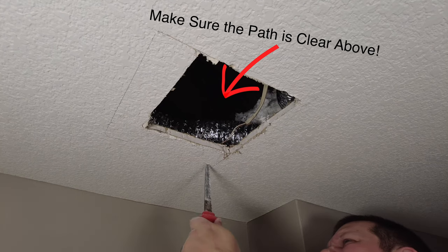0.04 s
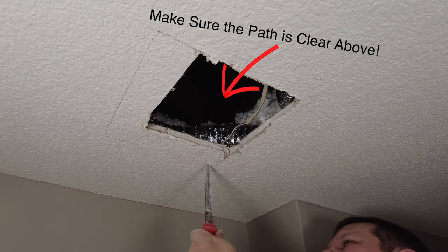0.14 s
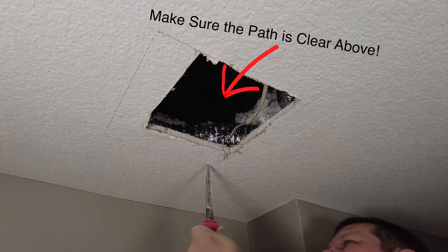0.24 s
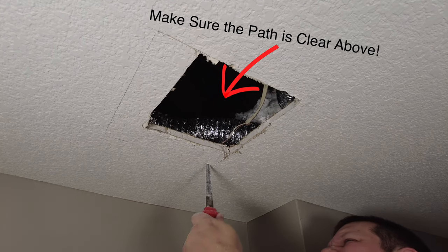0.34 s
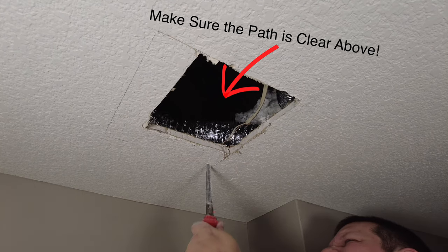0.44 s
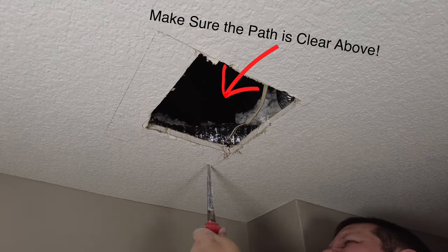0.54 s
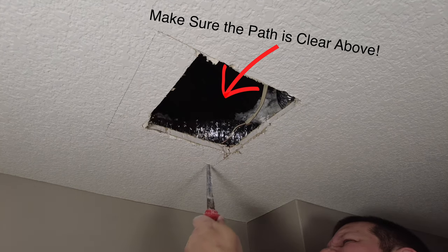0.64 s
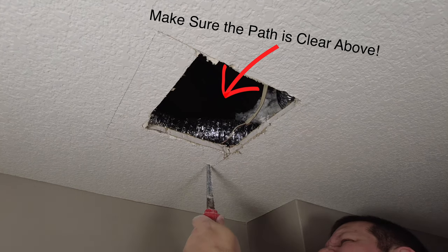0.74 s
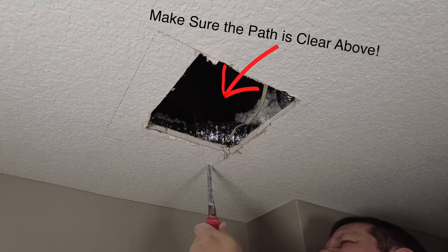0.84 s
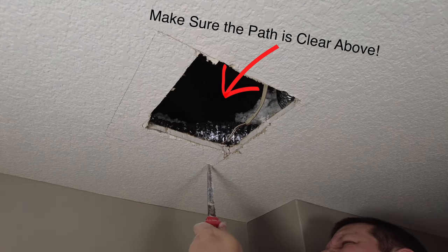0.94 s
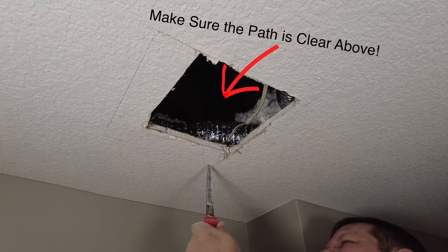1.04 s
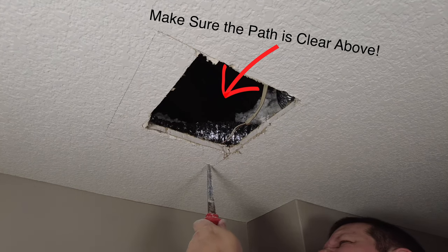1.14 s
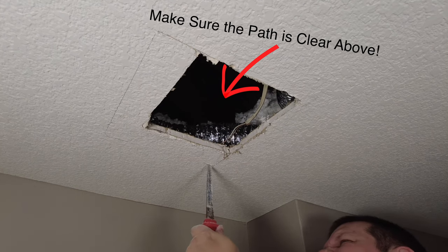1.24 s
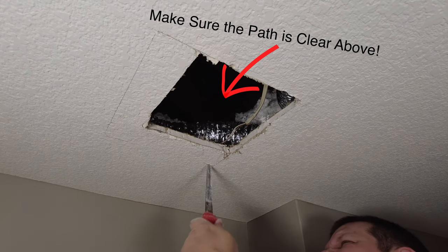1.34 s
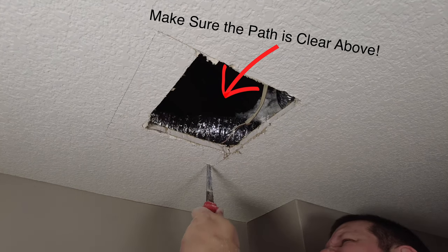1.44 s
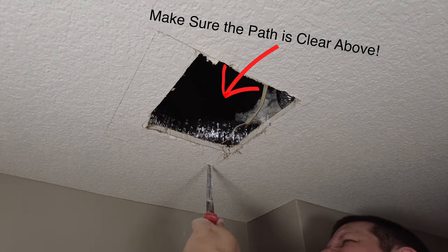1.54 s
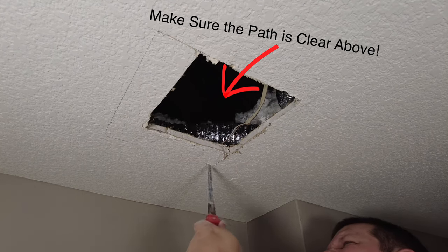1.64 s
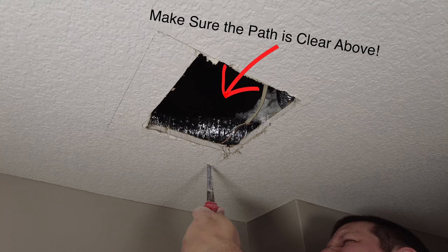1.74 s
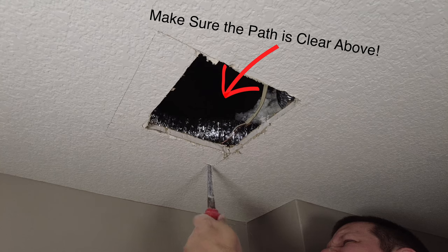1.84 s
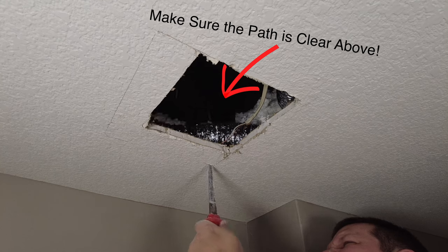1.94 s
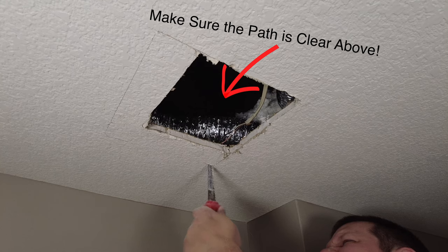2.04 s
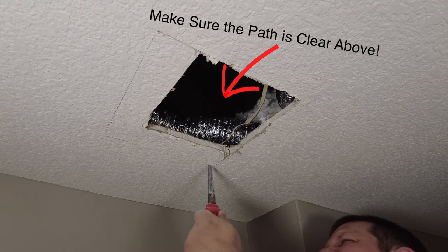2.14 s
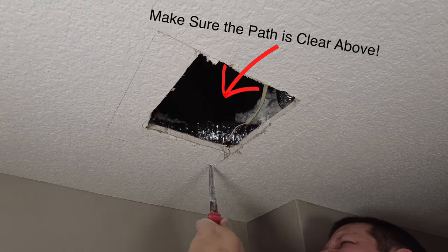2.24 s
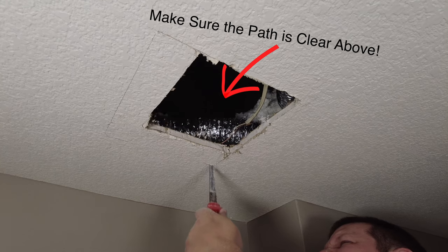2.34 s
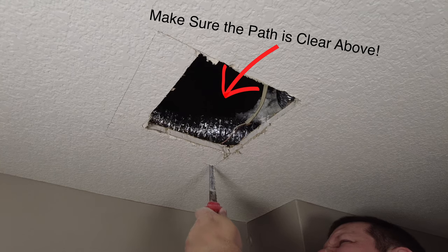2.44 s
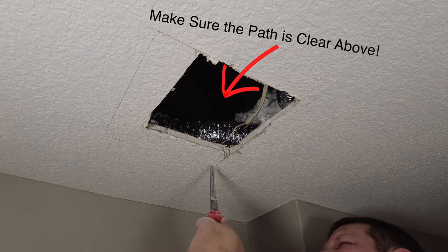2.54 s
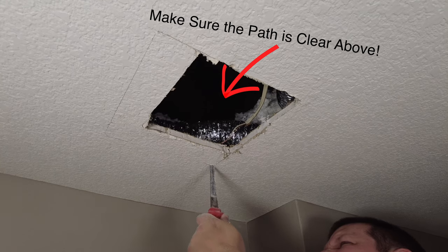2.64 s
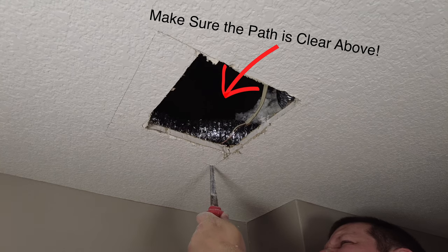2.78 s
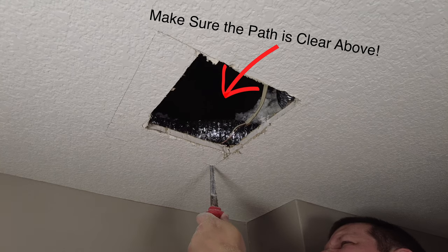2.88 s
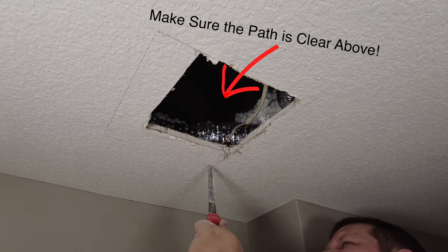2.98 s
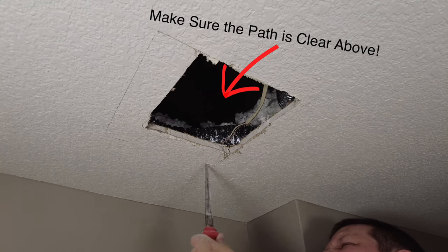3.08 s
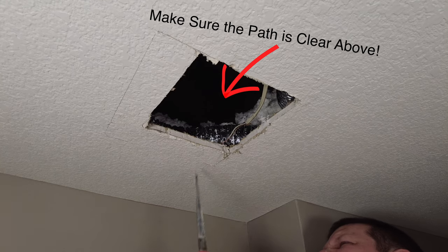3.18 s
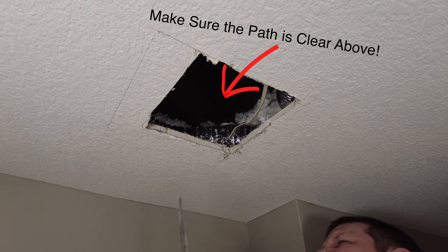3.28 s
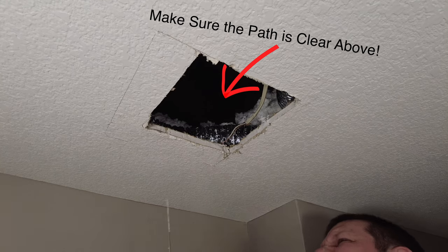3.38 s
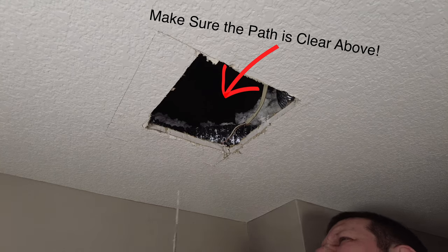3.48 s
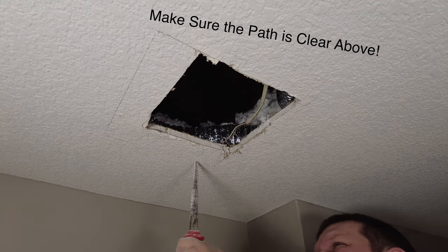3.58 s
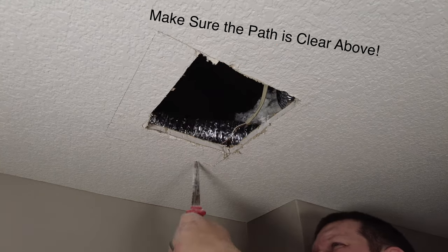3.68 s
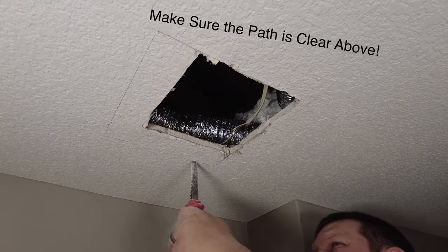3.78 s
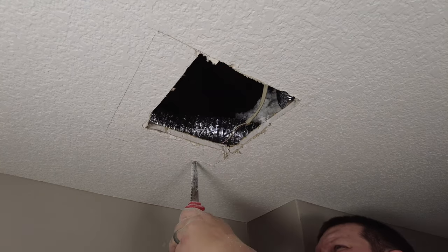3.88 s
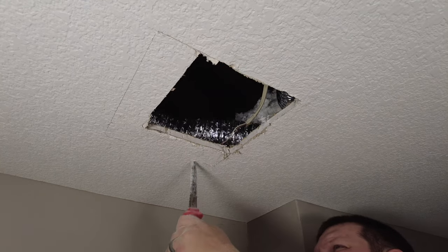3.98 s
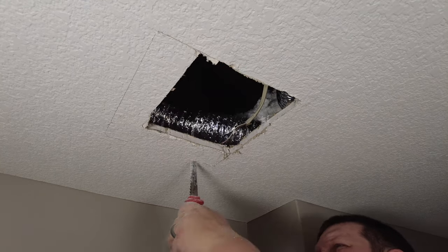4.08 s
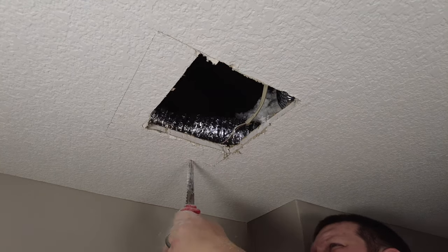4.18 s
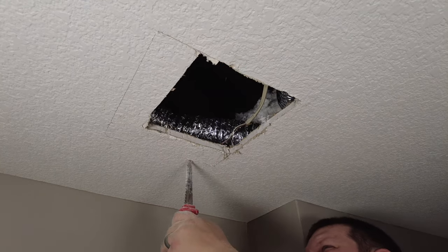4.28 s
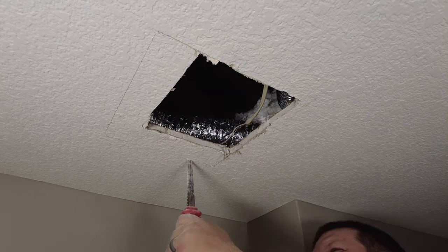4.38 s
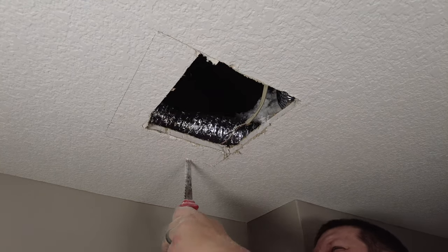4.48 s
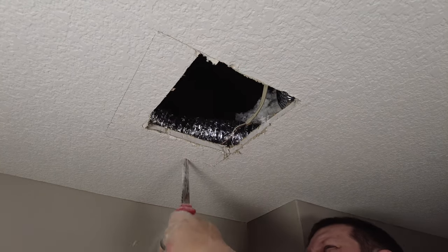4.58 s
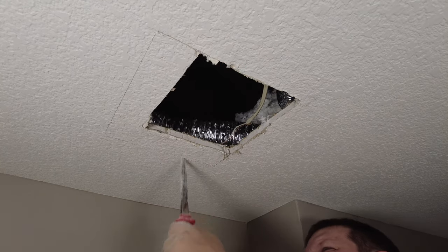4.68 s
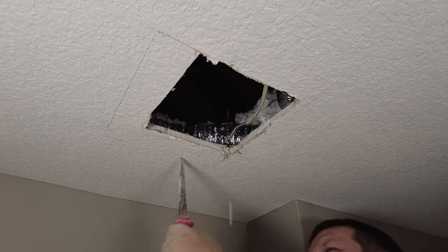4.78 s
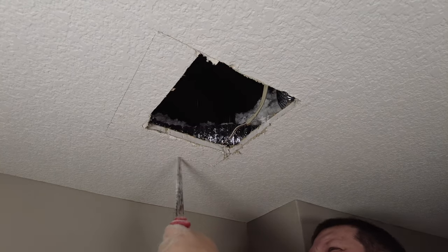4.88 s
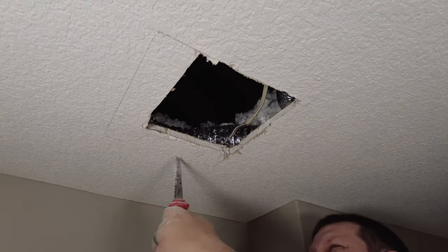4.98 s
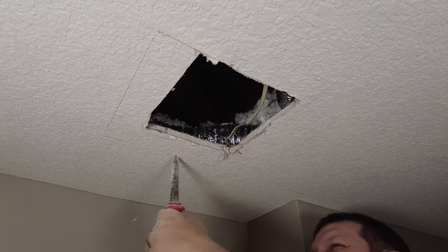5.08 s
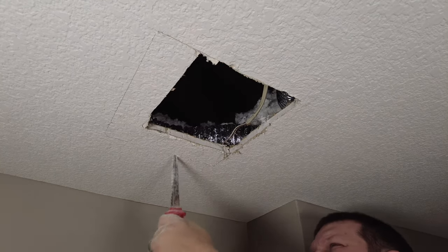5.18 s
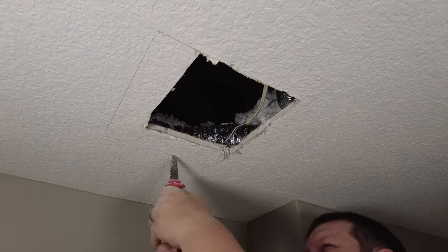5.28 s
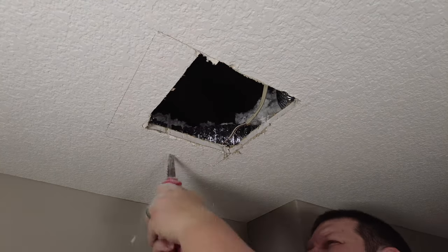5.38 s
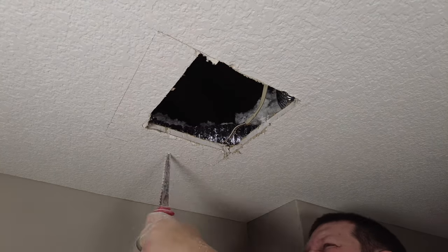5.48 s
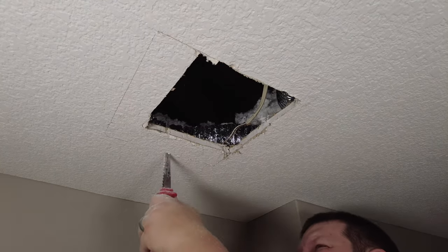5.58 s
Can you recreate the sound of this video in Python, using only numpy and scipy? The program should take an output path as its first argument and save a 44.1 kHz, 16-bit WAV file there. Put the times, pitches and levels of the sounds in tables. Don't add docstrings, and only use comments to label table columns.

```python
import sys
import numpy as np
from scipy import signal
from scipy.fft import rfft, irfft, next_fast_len
from scipy.io import wavfile
from scipy.ndimage import uniform_filter1d

SR = 44100
rng = np.random.default_rng(int(sys.argv[2]) if len(sys.argv) > 2 else 0)


def volts(x):
    e = np.asarray(x, float) / 20
    return 10 ** e


def unload_wav(signal):
    wavfile.write(
        sys.argv[1],
        SR,
        np.round(np.clip(np.atleast_2d(signal).T, -1, 1) * 32767).astype(np.int16),
    )


N = 247940
T = np.arange(N) / SR

# freq_hz, level_db_per_hz
AIR_SPECTRUM = [(15, -37), (25, 10.5), (77, -4), (152, -24), (458, -17.5), (946, -29), (1380, -29),
                (4630, -34.5), (13600, -52), (15600, -66)]
# start_s, length_s, force_db, flex_db, dust_db
PUSHES = [
    (-.1, 0.099, -31, -4, 14),
    (0.241, 0.2, -35, 2.5, 18),
    (0.612, 0.12, -24.5, 5, 2),
    (1.135, 0.026, -38, 16.5, 4),
    (1.378, 0.11, -24, -9, -4.5),
    (1.689, .12, -29.5, 3, 9),
    (1.996, 0.15, -26, 0.5, 2),
    (2.326, 0.11, -25.5, -3.5, 1),
    (2.611, 0.036, -49, -14, 32),
]
# start_s, length_s, force_db, flex_db, dust_db
PULLS = [(0.079, 0.14, -37.5, 4.5, 9), (0.44, 0.14, -33.5, 0, 5), (0.782, 0.14, -33.5, 2, 6),
         (0.959, 0.044, -44.5, 16.5, -8), (1.223, 0.099, -38.5, 1.5, 5), (1.347, 0.081, -33, 1.5, 7.5),
         (1.523, .13, -30.5, 0.5, 1), (1.841, 0.12, -28.5, -2, -2), (2.163, 0.14, -30.5, 0.5, 2.5),
         (2.477, 0.1, -29.5, -5.5, 1.5), (2.663, 0.085, -33.5, 3.5, 0), (2.822, 0.13, -57, -12, 7),
         (2.926, 0.15, -40.5, -9.5, 6), (3.051, 0.088, -43, -19, 9.5), (3.108, 0.084, -38, -10.5, 10)]
# start_s, length_s, force_db, flex_db, dust_db
DRAGS = [(3.59, 0.082, -54.5, 1, 5), (3.654, .18, -31, -3, 4), (3.915, 0.05, -60, 3.5, 5),
         (3.967, 0.033, -53, -1, -3), (4.008, 0.087, -37, -1.5, 16), (4.075, 0.2, -32, -6.5, 5),
         (4.26, 0.059, -32, 7.5, 4), (4.417, 0.067, -36.5, 1.5, 14), (4.476, 0.33, -31.5, 4, 4.5),
         (4.797, 0.087, -32, 10, 9), (4.878, 0.1, -29.5, 2.5, 2), (5.027, 0.085, -35.5, 4, 8),
         (5.152, 0.095, -42, 4.5, 1), (5.274, 0.13, -34.5, -1.5, 8), (5.384, 0.11, -33.5, -17, -1),
         (5.533, 0.016, -45, 11, 12), (5.583, 0.18, -24.5, -4.5, 0)]
# over_force_db, rise_s, sag_db_per_s, release_db_per_s
PUSH_LAYERS = [(2.5, 0.028, 13, 195), (2, 0.014, 9.5, 216), (-10.5, 0.01, 22, 249), (-27.5, 0.003, 95, 261)]
PULL_LAYERS = [(6.5, 0.026, 5, 250), (-1.5, 0.012, 26, 164), (-10.5, 0.012, 36, 157),
               (-24.5, 0.0077, 17, 370)]
DRAG_LAYERS = [(2.5, 0.0057, 2.1, 790), (-1, 0.0085, 18, 640), (-17.5, 0.0042, 2.6, 650),
               (-30.5, 0.012, 5, 1800)]
# drum_db, bite_db, scrape_db, grit_db
ARCH_DB = [
    [2.8, 6.4, 5.8, 0.72],
    [3.2, 3.4, 2.2, 7.8],
    [2.5, 0.94, 3.6, 1.3],
]
FLEX_SHARE = [1, 0.12, 0.016, 0.037]
DUST_SHARE = [0.037, 0.029, 0.11, 1]
# time_s, force_db
SNAGS = [(0.146, -34), (0.627, -24), (0.681, -22.5), (0.979, -34), (1.153, -31.5), (1.374, -32),
         (1.434, -24), (1.698, -26), (2.013, -22), (2.34, -21.5), (3.673, -36), (3.736, -28), (3.785, -25),
         (4.036, -27.5), (4.095, -27.5), (4.197, -25), (4.299, -28.5), (4.434, -43), (4.493, -31.5),
         (4.58, -35), (4.755, -30), (4.812, -33), (4.854, -35), (4.949, -29), (5.094, -30), (5.226, -30.5),
         (5.284, -33), (5.302, -22.5), (5.351, -28), (5.455, -35.5), (5.507, -37), (5.602, -26)]
# over_force_db, rise_s, fall_s
SNAG_LAYERS = [(-33, .002, .01), (-5, 0.00093, 0.01), (-16.5, 0.00074, 0.0062), (-38, 0.0011, 0.0053)]
STICK_DEPTH = [0.15, 0.18, 0.18, 0.28]
# time_s, force_db, fall_s
JERKS = [(1.697, -25.5, 0.024), (2.012, -55, 0.014), (2.345, -35, 0.023), (3.626, -44, .025),
         (3.671, -24, 0.022), (3.735, -23.5, 0.02), (3.782, -25, 0.022), (4.021, -51, 0.029),
         (4.091, -23.5, 0.022), (4.143, -21, 0.027), (4.199, -26, 0.029), (4.29, -20.5, 0.025),
         (4.433, -46, 0.02), (4.488, -20, 0.0081), (4.578, -25, 0.02), (4.641, -31, 0.022),
         (4.668, -23.5, 0.035), (4.752, -19.5, 0.025), (4.813, -36, 0.018), (4.85, -24, 0.025),
         (4.901, -47, 0.077), (4.945, -29.5, 0.026), (5.054, -42, 0.039), (5.095, -25.5, 0.036),
         (5.22, -28.5, 0.034), (5.291, -23, 0.035), (5.353, -22.5, 0.035), (5.41, -5.5, 0.014),
         (5.453, -18, 0.029), (5.598, -31.5, 0.045)]
# over_force_db, rise_s, fall_stretch
JERK_LAYERS = [(-6, 0.0016, 0.86), (-3, 0.0048, 0.99), (-19, 0.0053, 0.9), (-33.5, 0.0043, 0.92)]
# top_s, half_length_s, drum_db
HEAVES = [(0.185, 0.043, -26.5), (0.38, 0.053, -26.5), (0.476, 0.024, -26.5), (.575, 0.018, -30),
          (0.642, 0.031, -22), (0.733, 0.02, -32), (0.93, 0.018, -28), (1.47, 0.06, -21.5),
          (1.545, 0.028, -26.5), (1.734, 0.032, -17), (1.96, 0.077, -31), (2.05, 0.035, -21.5),
          (2.246, 0.049, -22), (2.411, 0.037, -17.5), (2.537, 0.031, -21.5), (2.752, 0.054, -35),
          (2.98, 0.025, -35.5), (3.734, 0.024, -24), (3.804, 0.019, -29), (4.123, 0.041, -25),
          (4.202, 0.02, -29), (4.3, 0.017, -31), (4.598, 0.0042, -23), (4.814, 0.019, -38),
          (4.867, 0.016, -44), (5.098, 0.01, -22.5), (5.18, 0.018, -30), (5.232, 0.021, -31),
          (5.297, 0.02, -29.5), (5.385, 0.017, -31)]
# time_s, grit_db
CRUMBLES = [
    (4.056, -48.5),
    (4.858, -55),
    (4.925, -61),
    (5.161, -50),
]
# drum_db, bite_db, scrape_db, grit_db
CRUMBLE_LAYERS_DB = [10, 3.5, -16, 12]
# freq_hz, width_hz, level_db
DRUM_MODES = [(72.35, 20, 0.5), (35.5, 15, -13), (115.3, 15, -11.5)]
# (freq_hz, width_hz, level_db)
CUTS = [
    (0, -21, [(158.4, 16, -4), (127.5, 26, -5), (210, 30, -8.5), (251, 18, -12)]),
    (3.5, 4.5, [(158.6, 26, 1), (197.4, 19, -7.5), (262, 29, -18)]),
    (5.02, 0.5, [(140, 19, -20), (191, 75, -31)]),
    (5.27, -9, [(145, 41, -6), (200, 41, -8.5)]),
]
# freq_hz, width_hz, level_db
BOARD_MODES_FIRST = [(324, 27.4, -4), (385.6, 23, -3), (424.6, 36, -4), (482.2, 30, -7), (560.6, 40, -5),
                     (606, 28, -7.5), (673, 60, -4), (745, 32, -9), (930, 24, -12.5)]
# freq_hz, width_hz, level_db
BOARD_MODES_LATER = [(334, 227, -1), (414.5, 115, -1.5), (565, 92, 0), (729, 162, -1.5), (857, 68, -3),
                     (927, 56, -2)]
# freq_hz, width_hz, level_db
RINGING_MODES = [(75, 8.2, -41), (210.3, 8, -39), (326.6, 10, -55), (418, 13, -55), (545.5, 8, -54),
                 (730.5, 10, -61), (768, 10, -57.5), (900, 14, -65)]
# freq_hz, width_hz, level_db
SHEET_MODES = [(1135, 22, -6), (1276, 19, 0), (1336, 17, -2), (1406, 17, -1), (1495, 17, -6),
               (1548, 15, -1), (1644, 17, -5), (1744, 17, -5), (1832, 20, -7), (2133, 26, -6),
               (2255, 22, -9), (2569, 22, -8), (2675, 26, -7), (2849, 22, -8)]
# freq_hz, width_hz, level_db
BLADE_MODES = [(1220, 213, 14.5), (1960, 46, -22), (2635, 120, 2.5), (4185, 110, -4.5), (6300, 82, -6),
               (7710, 140, 2.5), (9100, 63, -6)]
# freq_hz, level_db_per_hz
SCRAPE_FIRST = [(800, -50), (1000, -7.5), (1120, -5.5), (1290, 5), (1600, -3), (2000, -4.5), (2700, -5.5),
                (3250, -8), (3600, -26.5), (4400, -13.5), (5400, -47), (7000, -50), (10000, -67)]
# freq_hz, level_db_per_hz
SCRAPE_LATER = [(800, -38), (1000, -22), (1240, -2), (1600, 3), (1920, 0.5), (2300, -4), (2680, 0),
                (3200, -4.5), (3700, -16.5), (4320, -13.5), (5400, -27), (7000, -43), (10000, -64)]
# freq_hz, level_db_per_hz
GRIT_SPECTRUM = [(3000, -2.5), (4500, -1), (5500, -3), (6500, -3), (7700, -8), (9500, -6), (10200, -13.5),
                 (14100, -10), (15600, -16)]
# freq_hz, side_minus_mid_db
APART = [(60, -19), (130, -33), (290, -21), (640, -1.5), (1410, -12), (3100, -2), (6820, -3.5), (15000, -7)]
# freq_hz, level_db
LEAN = [(200, -40), (400, -29), (750, -9), (1300, -23), (2400, -40), (4000, -47)]
# freq_hz, t60_s
ROOM_DECAY = [(60, 0.35), (400, 0.28), (2000, 0.38), (12000, 0.38)]
# time_s, level_db
ROOM_DB = [(0, -3.5), (3.3, -1), (3.55, -30.5), (5.62, -10.5)]
# freq_hz, likeness 0-1
LIKENESS = [(60, 1), (200, 0.97), (500, 0.17), (1200, 0.24), (2500, 0.54), (6000, 0.13), (14000, 0.058)]
# freq_hz, width_hz, level_db
TIP_MODES = [(200, 48, -82), (523, 230, -81)]
# start_s, length_s, pitch_hz, level_db
SQUEAKS = [
    (4.81, 0.033, 7500, -60),
    (4.861, 0.053, 6400, -54),
    (4.862, 0.03, 7400, -55.5),
    (4.866, 0.023, 5260, -60),
    (4.919, 0.015, 7550, -54),
    (4.927, 0.026, 6260, -49),
    (4.926, 0.018, 5140, -57),
    (5.163, 0.018, 6300, -46),
    (5.4, 0.039, 7560, -56),
    (5.58, 0.029, 8050, -63),
]


def evened(x):
    return x / np.sqrt(np.mean(x ** 2) + 1e-20)


def read(points, hz):
    f, value = np.transpose(points)
    return np.interp(np.log(hz + 1), np.log(f + 1), value)


def coloured(x, points):
    size = next_fast_len(N)
    gain = volts(read(points, np.fft.rfftfreq(size, 1 / SR)))
    return irfft(rfft(x, size) * gain, size)[:N]


def modes(x, table, order=1):
    out = np.zeros(N)
    for k, (hz, width_hz, db) in enumerate(table):
        r = np.exp(-np.pi * width_hz / SR)
        poles = [1, -2 * r * np.cos(2 * np.pi * hz / SR), r * r]
        ring = signal.sosfilt([[1, 0, -1] + poles] * order, x)
        out += (-1) ** k * volts(db) * evened(ring)
    return out


def steadied(x, share, seconds):
    power = abs(uniform_filter1d(x ** 2, int(seconds * SR))) / np.mean(x ** 2)
    return evened(x / (power + 0.014) ** (share / 2))


def held(force, table, share, seconds):
    out = np.zeros(N)
    for hz, width_hz, db in table:
        out += volts(db) * steadied(modes(force, [(hz, width_hz, 0)], order=2), share, seconds)
    return out


def wander(hz):
    return evened(signal.lfilter(*signal.butter(2, hz, fs=SR), rng.standard_normal(N)))


def rising(u, rise_s):
    return (1 - np.exp(-np.maximum(u, 0) / rise_s)) ** 2


def hush():
    a, b = (evened(coloured(rng.standard_normal(N), AIR_SPECTRUM)) for _ in range(2))
    return volts(-57.5) * np.array([a + 0.69 * b, a - 0.46 * b])


def columns(layers):
    return np.transpose(layers)[..., None]


def strokes(t, rows, layers, arch_db):
    out = 0
    over_db, rise_s, sag, release = columns(layers)
    for start_s, length_s, force_db, flex_db, dust_db in rows:
        u = t - start_s
        db = force_db + over_db + np.c_[FLEX_SHARE] * flex_db + np.c_[DUST_SHARE] * dust_db
        db = db - np.c_[arch_db] * (2 * np.clip(u / length_s, 0, 1) - 1) ** 2
        db = db - sag * np.clip(u, 0, length_s) - release * np.maximum(u - length_s, 0)
        out = out + rising(u, rise_s) * volts(db)
    return out


def halts(t):
    stick_s, out = 0.0078, 1
    for at_s, _ in SNAGS:
        out = out * (1 - np.c_[STICK_DEPTH] * np.exp(-((t - at_s + stick_s) / stick_s) ** 2))
    return out


def snags(t):
    out = 0
    over_db, rise_s, fall_s = columns(SNAG_LAYERS)
    for at_s, force_db in SNAGS:
        u = np.maximum(t - at_s + 0.0012, 0)
        out = out + rising(u, rise_s) * volts(force_db + over_db) * np.exp(-u / fall_s)
    return out


def jerks(t):
    out = 0
    over_db, rise_s, stretch = columns(JERK_LAYERS)
    for at_s, force_db, fall_s in JERKS:
        u = np.maximum(t - at_s + 0.0035, 0)
        out = out + rising(u, rise_s) * volts(force_db + over_db) * np.exp(-u / (stretch * fall_s))
    return out


def heaves(t):
    return sum(volts(db) * np.exp(-((t - top_s) / half_s) ** 2) for top_s, half_s, db in HEAVES)


def crumbles(t):
    out = 0
    for at_s, grit_db in CRUMBLES:
        u = np.maximum(t - at_s, 0)
        level = volts(grit_db + np.c_[CRUMBLE_LAYERS_DB])
        out = out + rising(u, rise_s=0.0037) * level * np.exp(-u / 0.012)
    return out


def controls():
    t = T[::40]
    gains = np.full((4, len(t)), 1e-7)
    gains += strokes(t, PUSHES, PUSH_LAYERS, ARCH_DB[0])
    gains += strokes(t, PULLS, PULL_LAYERS, ARCH_DB[1])
    gains += strokes(t, DRAGS, DRAG_LAYERS, ARCH_DB[2])
    gains *= halts(t)
    gains += snags(t) + jerks(t) + crumbles(t)
    gains[0] += heaves(t)
    return np.array([np.interp(T, t, g) for g in gains])


def teeth(per_s, uneven, size_db):
    turns = np.cumsum(per_s * np.exp(uneven * wander(60))) / SR
    caught = np.diff(np.floor(turns), prepend=0) > 0
    return caught * volts(size_db * rng.standard_normal(N))


def crumbs(per_s, size_db, bites, clump):
    after = signal.lfilter([1], [1, -np.exp(-1 / (0.0077 * SR))], bites)
    size = volts(size_db * np.minimum(rng.exponential(1, N), 4)) * rng.choice([-1., 1.], N)
    falls = rng.random(N) < per_s / SR
    return size * falls * (1 + clump * evened(after)) * volts(0.52 * wander(29))


def contact(bites, cut, gains):
    _, bite, scrape, grit = gains
    first = cut == 0
    force = evened(bites - bites.mean()) + 1.234 * rng.standard_normal(N)
    grains = evened(crumbs(per_s=22000, size_db=1.0, bites=bites, clump=0.13))
    grains = grains + 0.75 * rng.standard_normal(N)

    board_first = evened(held(force, BOARD_MODES_FIRST, share=0.37, seconds=0.062))
    board_later = evened(held(force, BOARD_MODES_LATER, share=0.27, seconds=0.03))
    board = np.where(first, board_first, board_later)
    board = signal.sosfilt(signal.butter(3, [270, 950], "band", fs=SR, output="sos"), board)
    rap = volts(-5.5) * bite * steadied(board, share=0.48, seconds=0.088)

    ring = evened(modes(np.roll(grains, 200), BLADE_MODES, order=2))
    ring_low = signal.sosfilt(signal.butter(4, 5000, fs=SR, output="sos"), ring)
    kerf = np.where(first, evened(coloured(grains, SCRAPE_FIRST)), evened(coloured(grains, SCRAPE_LATER)))
    rasp = scrape * (kerf + volts([c[1] for c in CUTS])[cut] * ring_low)
    sheet = modes(scrape * grains * first, SHEET_MODES, order=2)
    sheet *= volts(-9) * np.std(rasp) / np.sqrt(len(SHEET_MODES))
    fizz = evened(coloured(grains, GRIT_SPECTRUM)) + volts(-5.0) * (ring - ring_low)
    return force, rap + rasp + grit * fizz + sheet


def lingering(force, drive, table, share, seconds):
    out = np.zeros(N)
    for hz, width_hz, db in table:
        r = np.exp(-2 * np.pi * width_hz / SR)
        stored = np.sqrt(signal.lfilter([1 - r], [1, -r], drive ** 2))
        out += volts(db) * evened(stored * steadied(modes(force, [(hz, width_hz, 0)]), share, seconds))
    return out


def saw():
    gains = controls()
    cut = np.searchsorted([c[0] for c in CUTS], T, "right") - 1
    r = np.exp(-1 / (0.00034 * SR))
    gains = np.sqrt(signal.lfilter([1 - r], [1, -r], gains ** 2))
    force, high = contact(teeth(per_s=170, uneven=0.5, size_db=3.5), cut, gains)
    other_force, other = contact(teeth(per_s=160, uneven=0.32, size_db=6.5), cut, gains)

    thud = np.choose(cut, [held(force, c[2], share=0.12, seconds=0.058) for c in CUTS])
    low = gains[0] * held(force, DRUM_MODES, share=0.85, seconds=0.0424) + gains[1] * thud
    drive = gains[1] * volts(np.where(cut == 0, 0, -22))
    hum = lingering(force, drive, RINGING_MODES, share=0.59, seconds=0.12)
    other += gains[0] * modes(other_force, DRUM_MODES + CUTS[0][2] + [(212, 9.6, -2.5)])
    return low, hum, high, coloured(other, APART)


def patchy(x, depth_db):
    z = signal.stft(x, nperseg=512)[2]
    field = rng.standard_normal(z.shape[:0:-1]).T
    for _ in range(2):
        field = uniform_filter1d(uniform_filter1d(field, size=4, axis=0), size=4, axis=1)
    gain = volts(depth_db * evened(field))
    return signal.istft(z * evened(gain), nperseg=512)[1][:, :N]


def tails(decays, count):
    hz, t = np.fft.rfftfreq(256, 1 / SR), np.arange(count) * 64 / SR
    a, b, c, d = rng.standard_normal((count, 129, 4)).T
    same, left = read(LIKENESS, hz)[:, None], a + 1j * b
    z = np.array([left, same * left + np.sqrt(1 - same ** 2) * (c + 1j * d)])
    z *= volts(-60 * t / read(decays, hz)[:, None])
    z /= np.sqrt((abs(z) ** 2).sum(2, keepdims=True))
    tail = signal.istft(z, nperseg=256, noverlap=192)[1]
    return tail / np.linalg.norm(tail[0])


def through(x, decays, turns_per_s, count, size=3):
    out = np.zeros((2, N))
    for k in range(size):
        share = np.sqrt(2 / size) * np.cos(np.pi * (turns_per_s * T + k / size))
        out += signal.oaconvolve((share * x)[None], tails(decays, count), axes=1)[:, :N]
    return out


def tip():
    touch_s, level_db = 3.605, -53
    t = np.arange(600) / SR
    puff = signal.lfilter([1], [1, -0.9], rng.standard_normal(600)) * np.exp(-t / 0.0014)
    out = np.zeros(N)
    out[int(touch_s * SR):][:600] = volts(level_db) * puff
    return out + modes(out, TIP_MODES)


def squeaks():
    out = np.zeros(N)
    for at_s, length_s, hz, db in SQUEAKS:
        t = np.arange(0, length_s, 1 / SR)
        waver_hz = 900 * uniform_filter1d(rng.standard_normal(4000), 30)[:len(t)]
        whistle = np.sin(2 * np.pi * np.cumsum(hz + waver_hz) / SR)
        part = out[int(at_s * SR):][:len(t)]
        part += (volts(db) * np.sin(np.pi * t / length_s) * whistle)[:len(part)]
    return out


def scene():
    low, hum, high, side = saw()
    high = high + tip() + squeaks()
    high, side = patchy(np.array([high, side]), depth_db=2.17)
    side = side + coloured(high, LEAN)
    near = low + hum + volts(-3.5) * high + volts(-2.0) * np.outer([1, -1], side)
    room_gain = volts(np.interp(T, *np.transpose(ROOM_DB)))
    room = through(room_gain * (0.75 * low + high), ROOM_DECAY, turns_per_s=1.255, count=260)
    return near + room + hush()


def low_pass(x):
    return signal.sosfilt(signal.butter(12, 15790, fs=SR, output="sos"), x)


def record(dry):
    mix = 0.63 * np.tanh(dry / 0.79)
    return low_pass(mix)


dry = scene()
out = record(dry)
unload_wav(out)
```